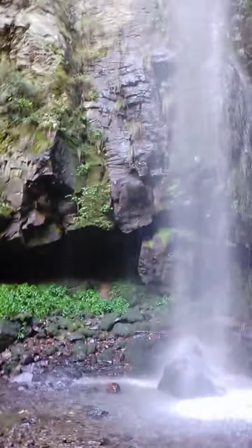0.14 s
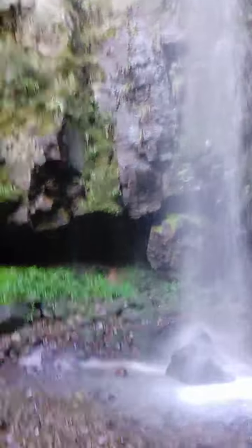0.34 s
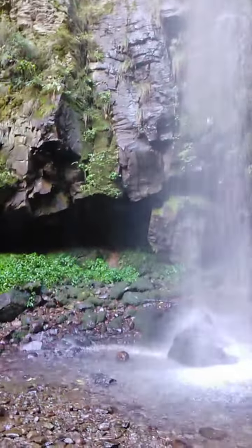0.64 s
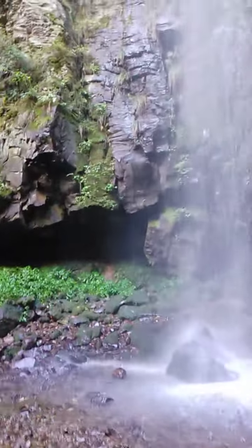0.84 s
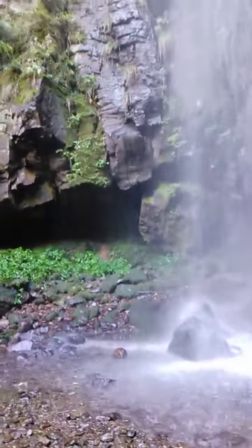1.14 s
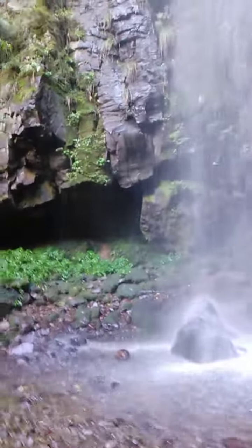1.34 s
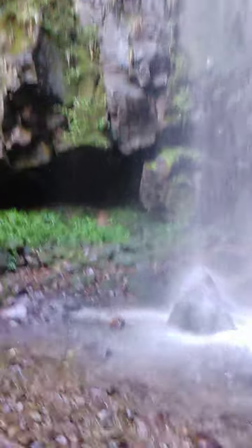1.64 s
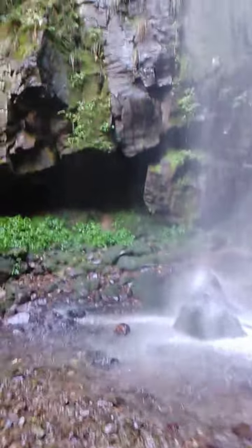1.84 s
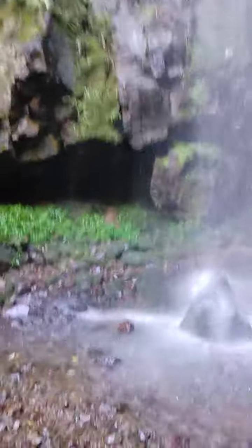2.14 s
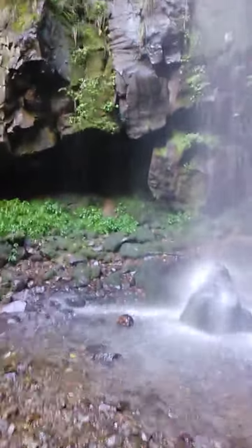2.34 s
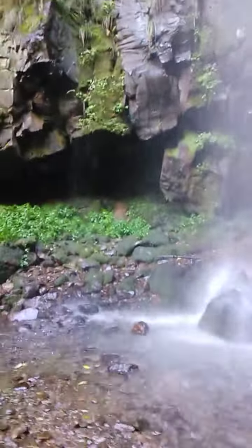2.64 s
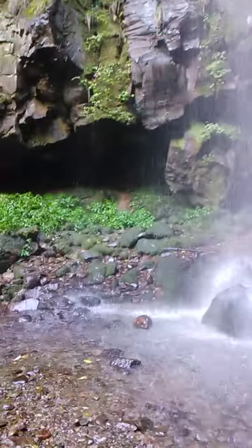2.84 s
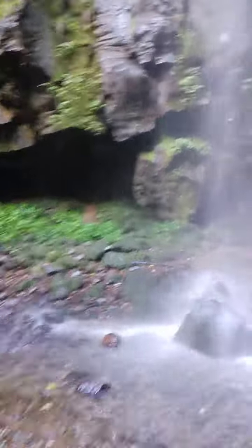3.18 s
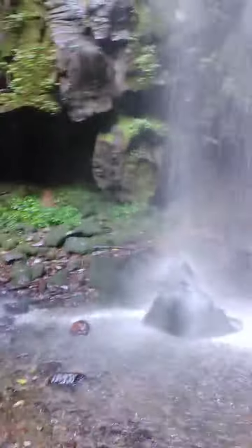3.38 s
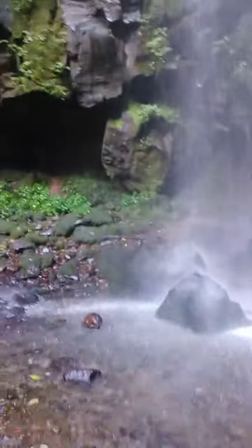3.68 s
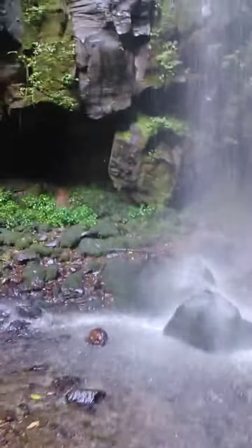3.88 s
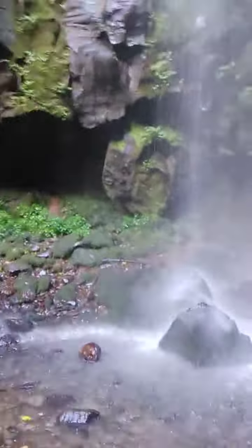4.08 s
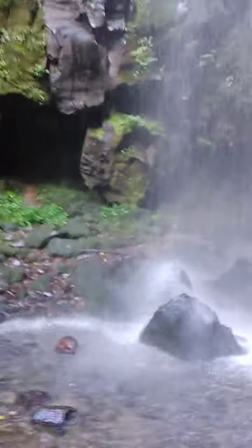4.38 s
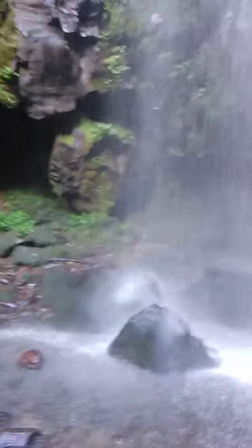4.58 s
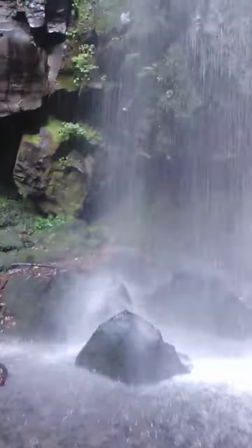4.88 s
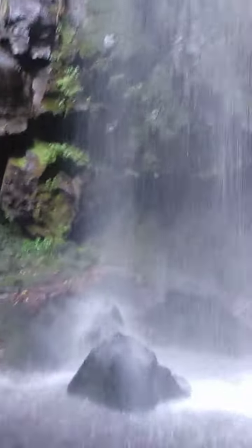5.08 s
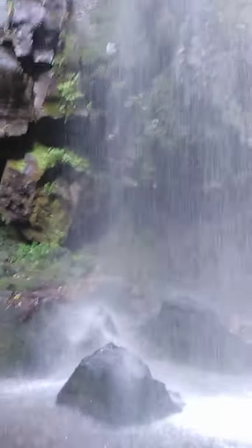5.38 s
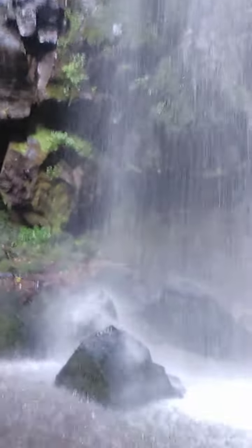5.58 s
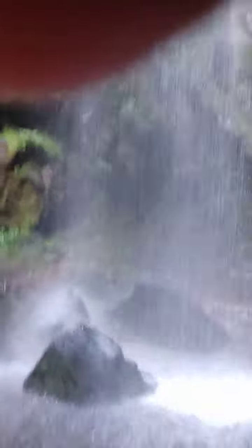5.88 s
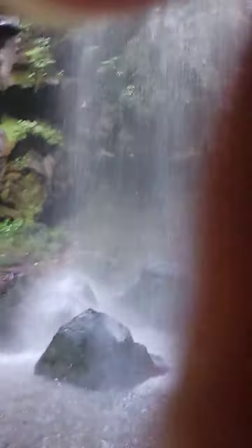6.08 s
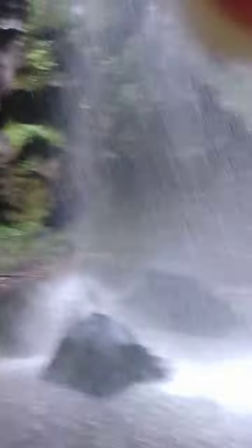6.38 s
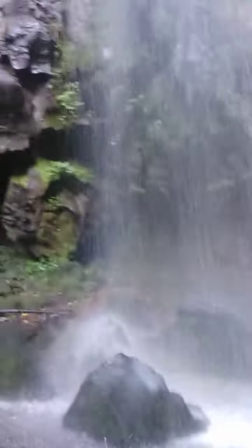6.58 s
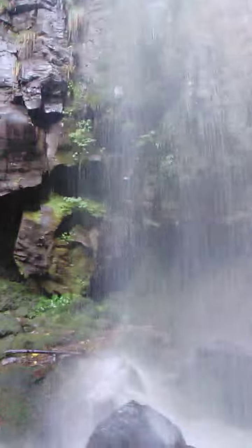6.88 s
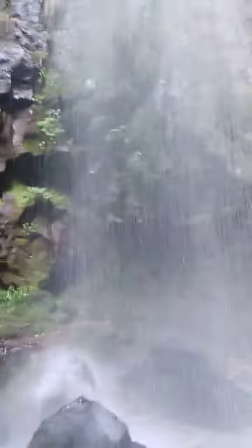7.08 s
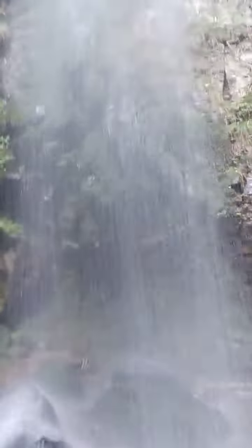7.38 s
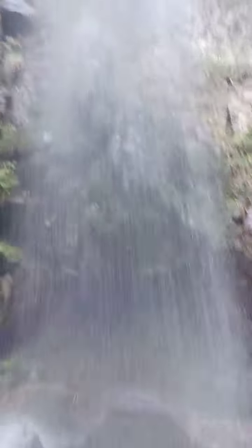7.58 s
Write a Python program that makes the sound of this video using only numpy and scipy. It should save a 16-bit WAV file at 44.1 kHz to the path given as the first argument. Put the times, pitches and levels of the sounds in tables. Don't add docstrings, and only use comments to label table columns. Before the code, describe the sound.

A waterfall pounds a boulder and shallow rocky pool without pause. Broad splashing fills the middle, a low plunge sits underneath, and spray and fine mist hiss brightly on top. A hand-held phone walks nearer, so the hiss slowly grows. Draughts thump softly on its single microphone, most clearly near two, three and seven and a half seconds. Around six seconds a hand briefly makes the rush hollow.

```python
import sys
import numpy as np
from scipy import signal
from scipy.fft import rfft, irfft, next_fast_len
from scipy.io import wavfile
from scipy.ndimage import uniform_filter1d, map_coordinates

SR = 44100
rng = np.random.default_rng(int(sys.argv[2]) if len(sys.argv) > 2 else 0)


def wav_record(signal):
    frames = np.transpose(np.atleast_2d(signal))
    bounded = np.clip(frames, -1, 1)
    quanta = np.round(bounded * 32767).astype(np.int16)
    wavfile.write(sys.argv[1], SR, quanta)


def attenuation_scalar(level_db):
    decades = np.asarray(level_db, float) / 20
    return 10 ** decades


N = 340452
HZ = np.fft.rfftfreq(1024, 1 / SR)[:, None]
T = np.arange(N // 256 + 2) * 256 / SR


def frames(x):
    return signal.stft(np.pad(x, (0, 512)), nperseg=1024, noverlap=768)[2][:, :len(T)]


def sound(z):
    return signal.istft(z, nperseg=1024, noverlap=768)[1][..., :N]


def unit(x):
    return x / np.sqrt(np.mean(np.abs(x) ** 2) + 1e-20)


def smooth(x, rows, columns):
    return uniform_filter1d(uniform_filter1d(x, size=rows, axis=0), size=columns, axis=1)


def colour(points, hz):
    f, db = np.transpose(points)
    return attenuation_scalar(np.interp(np.log(hz + 1), np.log(f), db, left=-120, right=-120))


def curves(rows, t):
    s, *columns = np.transpose(rows)
    return [np.interp(t, s, column) for column in columns]


def wobble(rate):
    return map_coordinates(rng.standard_normal(4000), [np.arange(N) * rate / SR])


def band(centre_hz, width, t=T):
    waver = map_coordinates(rng.standard_normal(400), [t * 9])
    away = np.abs((np.log(HZ + 1) - np.log(centre_hz)) / width + 0.12 * waver)
    return np.exp(-away ** 3)


def hollow(rows, width, edge):
    total_db = np.zeros((len(HZ), len(T)))
    for start_s, length_s, from_hz, to_hz, lift_db in rows:
        u = (T - start_s) / length_s
        held = (np.tanh(u / edge) - np.tanh((u - 1) / edge)) / 2
        on = held > 0.01
        centre_hz = from_hz + (to_hz - from_hz) * np.clip(u[on], 0, 1)
        total_db[:, on] += lift_db * held[on] * band(centre_hz, width, T[on])
    return attenuation_scalar(total_db)


def drops(per_second, spread_db, share):
    hit = rng.random(N) < per_second / SR
    size = rng.standard_normal(N)
    near = unit(hit * np.sign(size) * attenuation_scalar(spread_db * np.abs(size)))
    return share * near + rng.standard_normal(N)


def sheet(spectrum, level_db, impacts, patchy_db):
    patches = unit(smooth(rng.standard_normal((len(HZ), len(T))), 6, 6))
    z = frames(impacts) * colour(spectrum, HZ) * attenuation_scalar(patchy_db * patches)
    return z * attenuation_scalar(level_db) / np.std(sound(z))


def clumps():
    return attenuation_scalar(0.07 * wobble(45) + 0.27 * wobble(100))


# time_s, nearness_db, port_turned_to_mist_db
STEPS = [(0, -19, 0.8), (.6, -19.3, -0.1), (1.3, -18, .5), (1.7, -18.8, 0.5), (2, -18, -0.1),
         (2.7, -17, 0.5), (3.2, -16.6, 0.6), (3.6, -17, 1.5), (3.95, -16.5, 0.2), (4.3, -16.5, 0.5),
         (5, -15.5, 0), (5.7, -15.5, 1), (6, -15, -.6), (6.56, -14.3, .3), (6.8, -15.5, 0.3),
         (7.2, -14.5, -1), (7.33, -15.5, -0.2), (7.72, -14, .1)]


def walk():
    near_db, turn_db = curves(STEPS, T)
    return near_db - near_db.mean(), turn_db


# pitch_hz, level_db (per Hz)
PLUNGE_TONE = [(53, -39), (90, -10.5), (140, -3.5), (259, 0), (400, 2.5), (600, -7.5), (780, -55),
               (1320, -120)]


def plunge():
    faced_s = 3.2
    level_db = -37.5 - 0.32 * (T - faced_s) ** 2
    return sheet(PLUNGE_TONE, level_db, rng.standard_normal(N), patchy_db=0.9)


# pitch_hz, level_db (per Hz)
SPLASH_TONE = [(210, -7), (350, -13), (432, -9), (631, -1.5), (1150, -2), (1350, -2.5), (1800, -1.5),
               (2480, -4.5), (5000, -4.5), (6500, -27), (11000, -120)]


def splash(near_db, shared):
    impacts = shared * drops(500, spread_db=4, share=0.17)
    return sheet(SPLASH_TONE, -24 + 0.51 * near_db, impacts, patchy_db=1.09)


# pitch_hz, level_db (per Hz)
SPRAY_TONE = [(2240, -6.5), (3800, -7), (4580, -3.5), (5760, 0.5), (6780, 2.5), (8900, 1.5), (10500, -3.5),
              (13600, -15), (22000, -120)]


def spray(near_db, turn_db, shared):
    level_db = -23.5 + 1.08 * near_db - 0.7 * turn_db
    impacts = shared * clumps() * drops(800, spread_db=3, share=0.23)
    return sheet(SPRAY_TONE, level_db, impacts, patchy_db=0.9)


# pitch_hz, level_db (per Hz)
MIST_TONE = [(5600, -44), (9500, -1.5), (11000, 2), (12200, 3), (13300, 1.5), (14200, 3), (15300, 3.5),
             (15740, 5.5), (15790, -60)]


def mist(near_db, turn_db, shared):
    impacts = shared * clumps() * drops(1200, spread_db=2, share=0.22)
    return sheet(MIST_TONE, -21 + 1.07 * near_db + turn_db, impacts, patchy_db=0.3)


# time_s, ridge_spacing_hz, mirror_strength (0 to 1)
POOL_ECHO = [(0, 1000, .3), (1.5, 1070, 0.43), (2.2, 1100, 0.27), (3, 1060, .05), (4, 915, .28),
             (5, 705, 0.2), (6, 627.6, .52), (6.6, 585, 0.73), (7.72, 530, .66)]


def pool():
    clear_from_hz, clear_to_hz = 350, 1180
    spacing_hz, strength = curves(POOL_ECHO, T)
    r = np.clip(strength, 0, 0.95)
    r = r / (1 + (HZ / clear_to_hz) ** 4) / (1 + (clear_from_hz / (HZ + 1)) ** 4)
    ridges = np.sqrt(1 + 2 * r / (1 + r * r) * np.cos(2 * np.pi * HZ / spacing_hz))
    gravel = attenuation_scalar(-4.5 * band(0.606 * spacing_hz, width=0.16))
    return ridges * gravel


# start_s, length_s, from_hz, to_hz, lift_db
LEDGES = [(-0.55, 1.25, 1400, 1830, 4), (.25, 1.6, 3700, 3780, -2.5), (2, 2.3, 3100, 3050, -1.5),
          (2, .6, 1680, 1670, 1.5), (5, 0.57, 3800, 3800, -2), (3.45, 0.44, 2100, 2050, 1.5),
          (0.5, 1.8, 300, 310, 3), (6.5, 1.3, 3100, 3050, 4), (7, .55, 10900, 10500, -1.5)]
# start_s, length_s, from_hz, to_hz, lift_db
SHELVES = [(.2, .6, 2650, 2800, 2.5), (.3, .6, 1270, 1280, 3.5), (1.2, .5, 3000, 3200, 3.5),
           (1.7, 0.89, 2230, 2250, 1.5), (1.83, 0.39, 4450, 4500, 2.5), (3.1, 0.92, 2260, 2150, 1.5),
           (3.7, 1.03, 3300, 3130, 4.5), (4.2, 1.3, 1970, 2100, 3), (4.7, .5, 4550, 4400, 3),
           (5.35, 0.33, 4700, 4630, -4), (5.8, .35, 4500, 4500, 3.5), (6.1, 0.38, 2130, 2100, 4.5),
           (6.19, .4, 2750, 2700, 3), (7.05, 1, 2520, 2550, 3.5), (7.4, .6, 3630, 3480, 3)]


def cliff():
    return hollow(LEDGES, width=0.12, edge=0.16) * hollow(SHELVES, width=0.066, edge=0.2)


# start_s, length_s, from_hz, to_hz, lift_db
PALM_HOLLOW = [
    (-.5, 5.9, 6800, 7150, 2.5),
    (2.95, 0.46, 7400, 7600, 1),
    (5.82, .9, 7200, 6500, 4),
    (6.72, .56, 7360, 8200, 3.5),
]
# start_s, length_s, from_hz, to_hz, lift_db
FINGER_GAPS = [(1.7, 2.2, 12200, 12050, 4), (3.9, 1.9, 12100, 12100, 2), (5.86, .35, 9300, 9300, 2.4),
               (5.88, .32, 13900, 13900, -2), (6.3, 0.4, 10200, 12200, 3), (6.65, .35, 12200, 12700, 2.5),
               (6.95, .35, 13200, 14200, 3), (2.55, .35, 10600, 10800, 2.5)]
# start_s, length_s, from_hz, to_hz, lift_db
CUPPED_HAND = [
    (-1.1, 6.1, 1130, 1000, 3.3),
    (5.82, .38, 1160, 1140, 6.6),
    (7, .4, 1600, 1520, 2.5),
    (7, .55, 1900, 2000, 5.5),
    (7.45, .6, 2000, 2150, 7),
]


def hand():
    palm = hollow(PALM_HOLLOW, width=0.21, edge=0.024)
    fingers = hollow(FINGER_GAPS, width=0.079, edge=0.2)
    return palm * fingers * hollow(CUPPED_HAND, width=0.12, edge=0.23)


def fall():
    near_db, turn_db = walk()
    shared = attenuation_scalar(0.12 * wobble(40) + 0.4 * wobble(90))
    z = plunge() + splash(near_db, shared)
    z += spray(near_db, turn_db, shared) + mist(near_db, turn_db, shared)
    return sound(z * pool() * cliff() * hand())


# pitch_hz, level_db (per Hz)
BUFFET_TONE = [(18, -30), (32, -17), (50, -5.5), (75, -1.5), (110, -9), (160, -8), (300, -40)]
# time_s, rise_over_calm_db
GUST_TIMES = [(1.33, 10), (1.95, 5), (2.35, 11), (2.65, 4), (3.24, 8), (3.5, 5.2), (4.52, 6.8), (5.252, 8),
              (6.1, 3), (6.8, 6), (7.2, 4), (7.6, 8)]


def buffeting():
    t = np.arange(N) / SR
    gust_s = 0.18
    m = next_fast_len(N + 8192)
    low = irfft(rfft(rng.standard_normal(m)) * colour(BUFFET_TONE, np.fft.rfftfreq(m, 1 / SR)), m)[:N]
    level_db = -60 + 0.9 * t
    for s, rise_db in GUST_TIMES:
        level_db += rise_db * np.exp(-((t - s) / gust_s) ** 2)
    return attenuation_scalar(level_db) * unit(low * attenuation_scalar(1.7 * wobble(9.5)))


# time_s, peak_db, pitch_hz, length_cycles
PUFF_TIMES = [(1.54, -44, 50, 1.5), (2.101, -24, 69, 1.1), (2.183, -44, 100, 1.1), (2.244, -33, 78, 1.1),
              (3.104, -26, 83, 0.65), (3.136, -38, 68, 1), (3.298, -40, 88, 1), (4.723, -37, 85, 1),
              (5.837, -34, 90, 0.81), (6.139, -33, 84, 1), (6.833, -31.5, 98, 2.1), (7.428, -35, 80, 1),
              (7.448, -35, 92, 1.2), (7.475, -27, 70, 1.4), (7.521, -33, 100, 1), (7.546, -37, 90, 1),
              (7.564, -39, 55, 0.88), (7.59, -31, 70, 1.3)]


def puffs():
    t = np.arange(N) / SR
    air = np.zeros(N)
    for s, peak_db, hz, cycles in PUFF_TIMES:
        near = slice(round(s * SR) - 2600, round(s * SR) + 2600)
        turn = (t[near] - s) * hz
        swell = np.exp(-np.abs(turn / (0.65 * cycles)) ** 1.9)
        air[near] += attenuation_scalar(peak_db) * swell * np.cos(2 * np.pi * (turn - 0.06 * turn ** 2) - 1.9)
    return air


def scene():
    return np.tile(fall() + buffeting() + puffs(), (2, 1))


# time_s, centre_hz
WIDE_SPLITS = [(.299, 13800), (.345, 14500), (.926, 12760), (1.483, 13080), (1.576, 8280), (1.854, 9680),
               (1.878, 10950), (1.878, 14480), (2.296, 9310), (2.296, 13070), (2.76, 12080), (2.969, 12420),
               (3.062, 6640), (3.666, 11700), (3.898, 15160), (4.2, 9310), (4.2, 13110), (4.269, 12070),
               (4.409, 8970), (4.78, 11720), (4.827, 13100), (5.059, 14480), (5.198, 13100), (5.314, 11430),
               (5.337, 11320), (5.43, 11730), (5.43, 13830), (5.941, 14820), (6.197, 12430), (6.289, 15190)]
# time_s, centre_hz
NARROW_SPLITS = [(.299, 6930), (.647, 4700), (.717, 5740), (.926, 6940), (1.576, 4700), (2.296, 5170),
                 (3.666, 6300), (3.898, 4700), (4.409, 5480), (4.548, 5200), (4.711, 6320), (4.78, 8960),
                 (4.827, 10350), (5.059, 5200), (5.198, 4720), (5.779, 9680), (6.011, 5760)]


def split_channels(mono):
    mid = frames(mono) * (HZ < 15770)
    apart = np.zeros(mid.shape)
    for rows, width_hz in [(WIDE_SPLITS, 1830), (NARROW_SPLITS, 1160)]:
        for s, hz in rows:
            apart[np.ix_(np.abs(HZ[:, 0] - hz) < width_hz / 2, np.abs(T - s) < 0.013)] = 1
    strength = np.sqrt(np.abs(smooth(np.abs(mid) ** 2, 15, 5)))
    side = sound(attenuation_scalar(-2.0) * unit(frames(rng.standard_normal(N))) * strength * apart)
    kept = sound(mid * (1 - 0.31 * apart))
    return np.array([kept + side, kept - side])


def low_pass(x):
    return signal.sosfilt(signal.butter(12, 17090, fs=SR, output="sos"), x)


def record(dry):
    mono = dry[0] / (1 + np.abs(dry[0] / 0.8) ** 6) ** (1 / 6)
    return low_pass(split_channels(mono))


dry = scene()
out = record(dry)
wav_record(out)
```